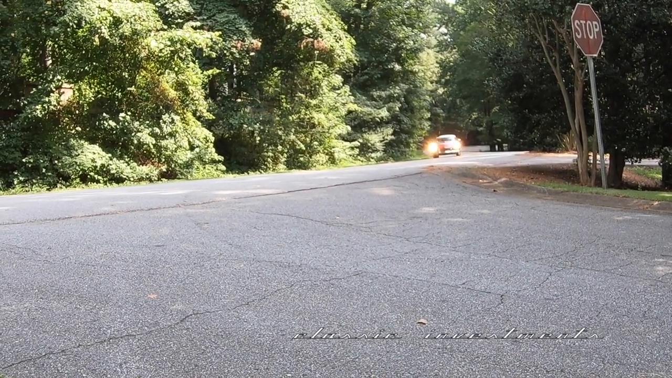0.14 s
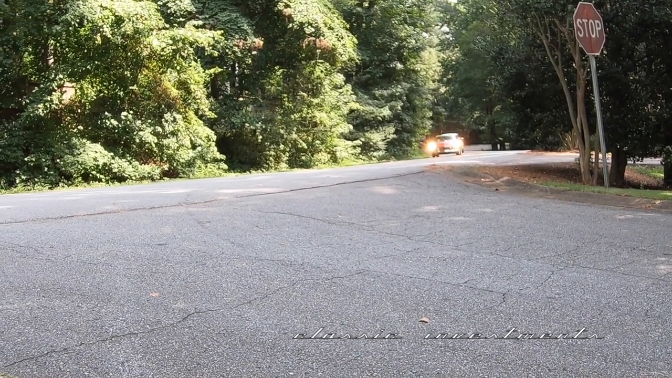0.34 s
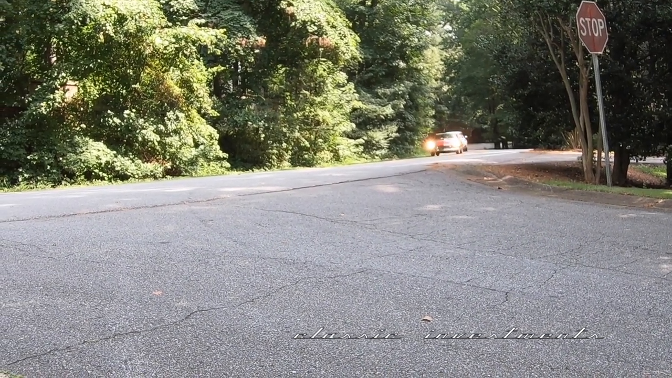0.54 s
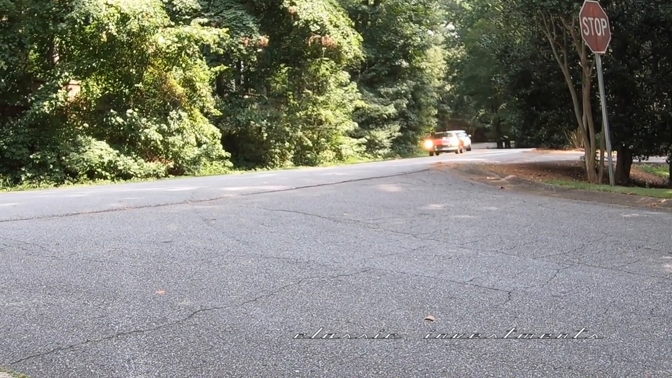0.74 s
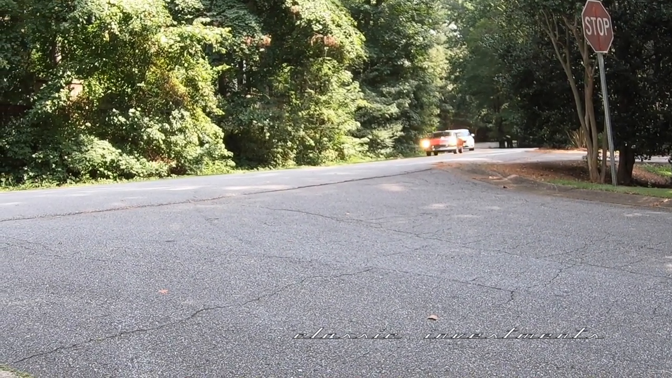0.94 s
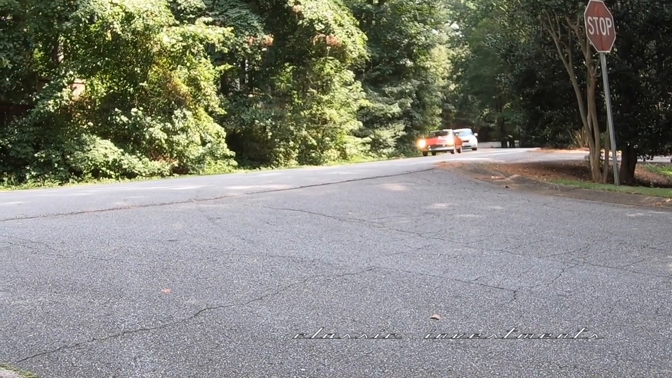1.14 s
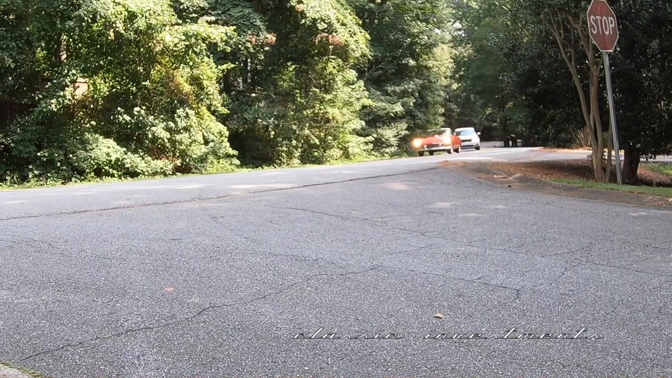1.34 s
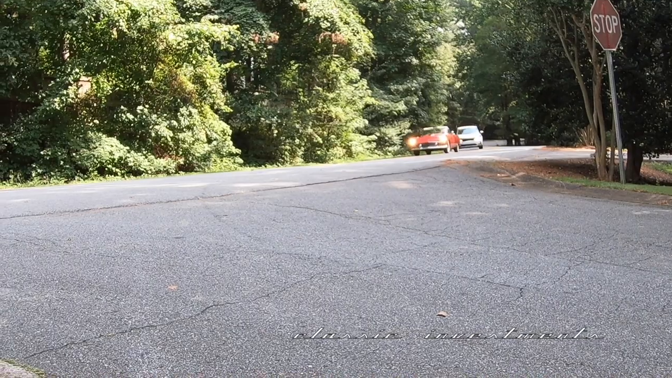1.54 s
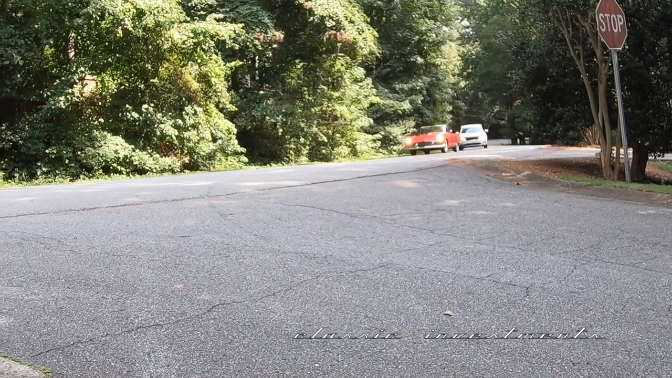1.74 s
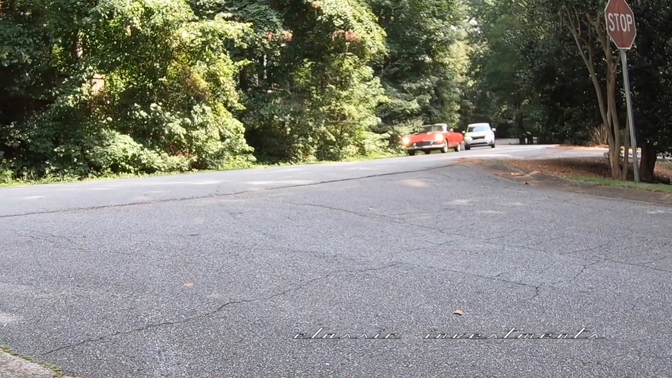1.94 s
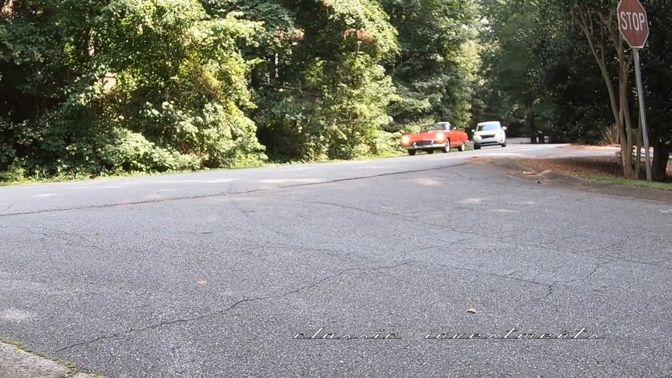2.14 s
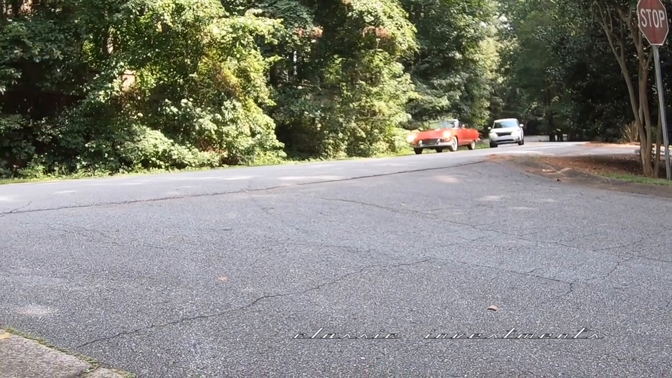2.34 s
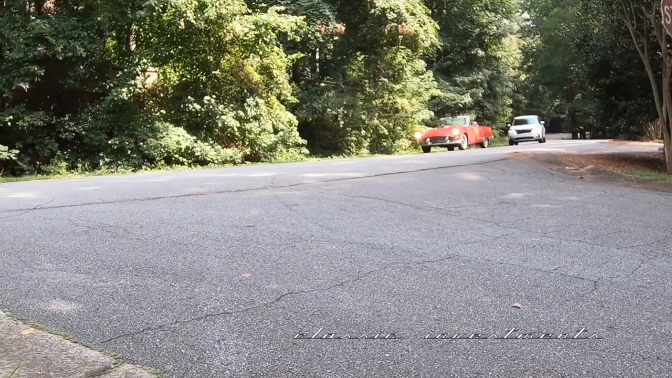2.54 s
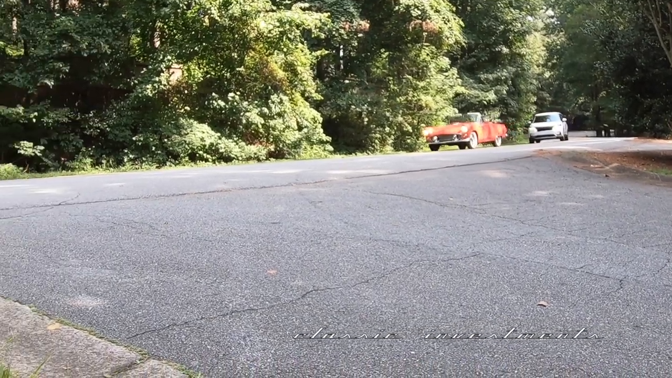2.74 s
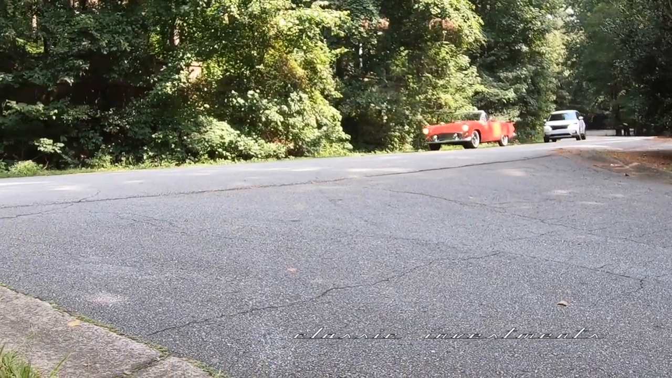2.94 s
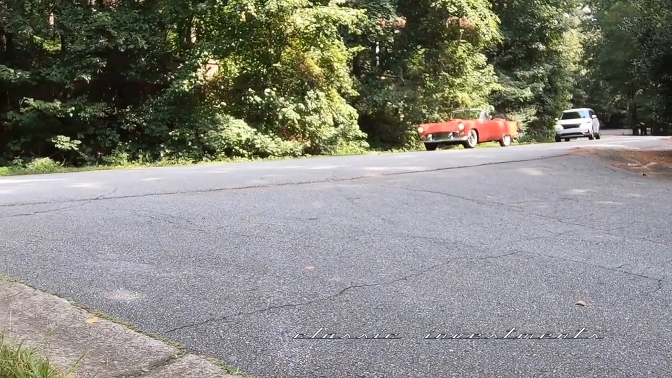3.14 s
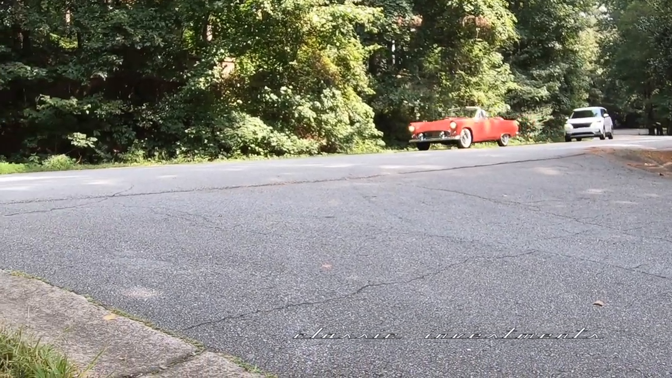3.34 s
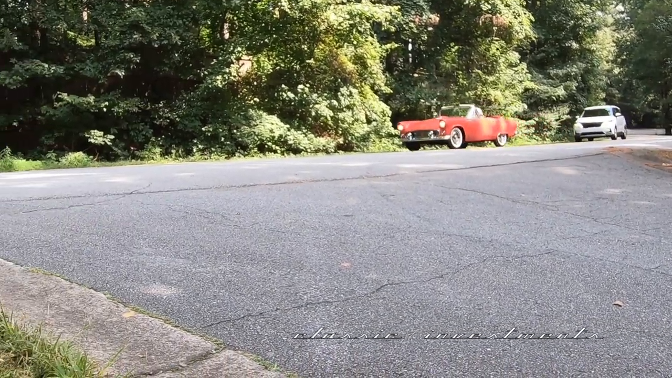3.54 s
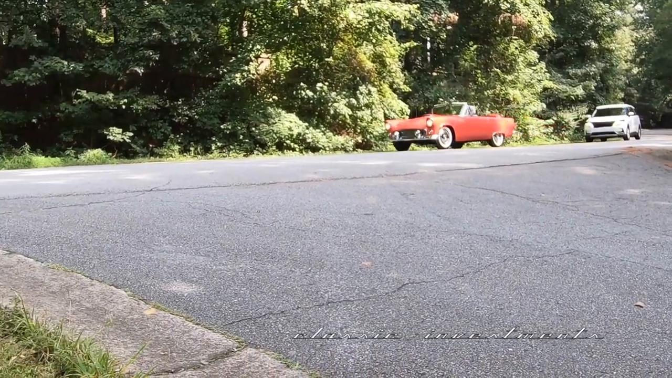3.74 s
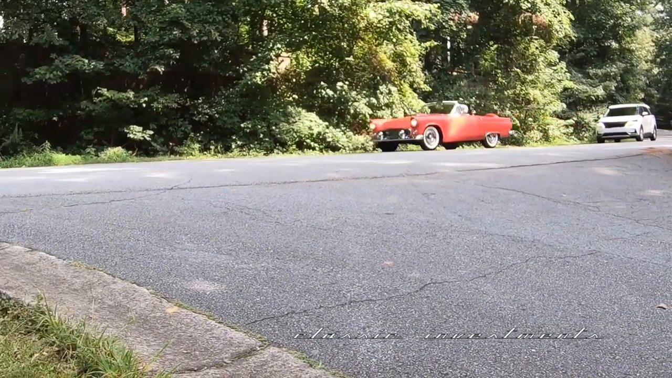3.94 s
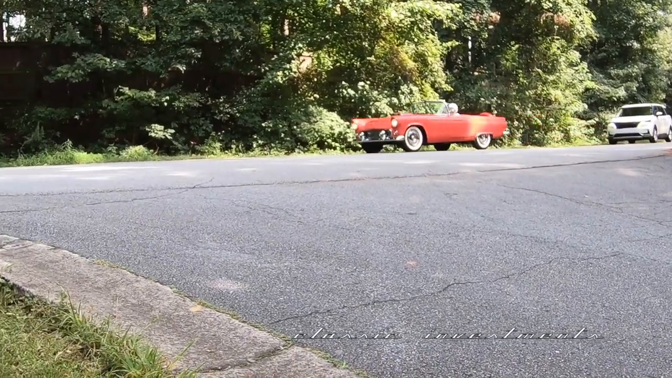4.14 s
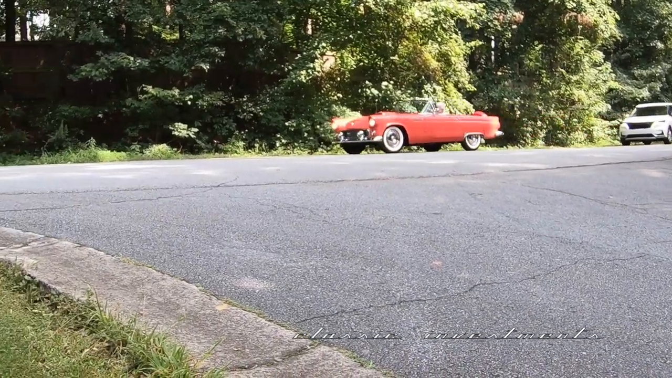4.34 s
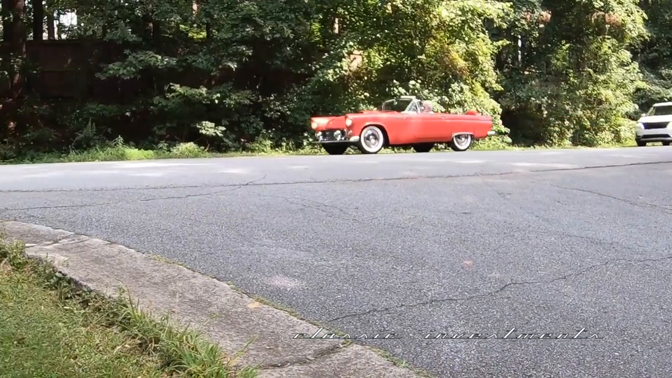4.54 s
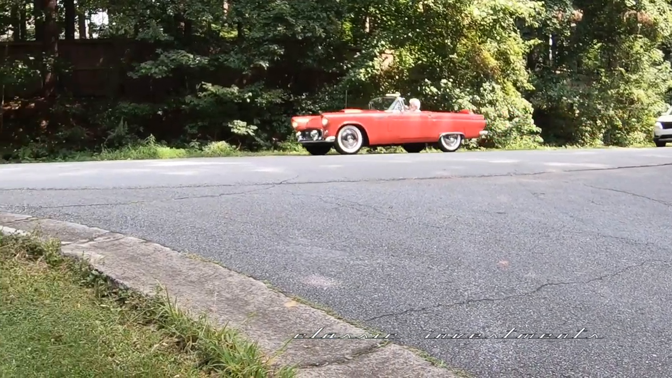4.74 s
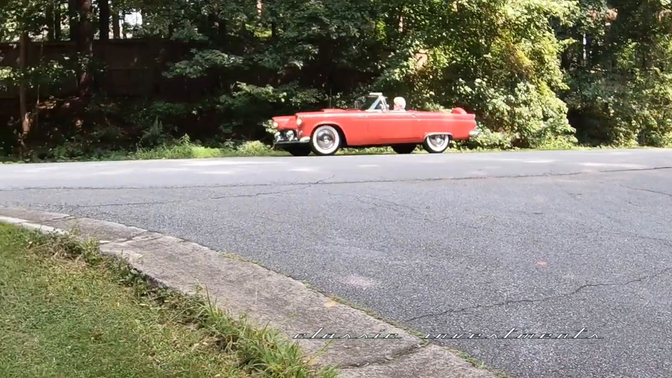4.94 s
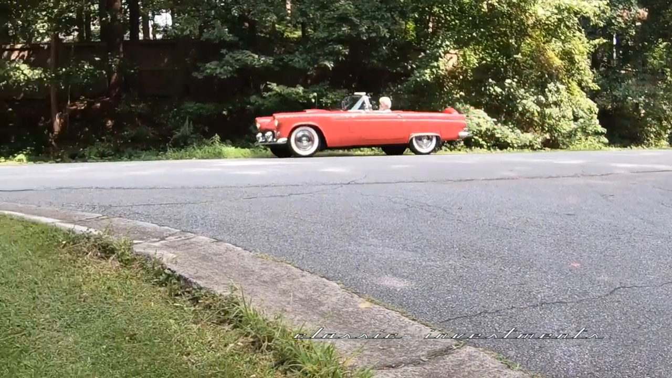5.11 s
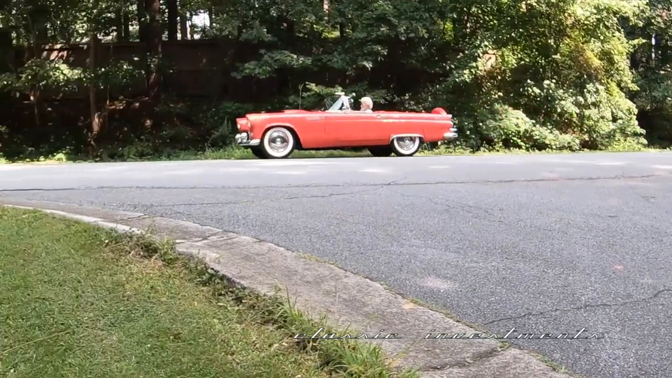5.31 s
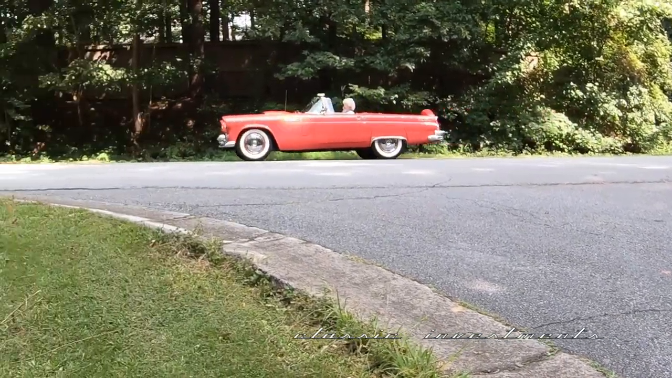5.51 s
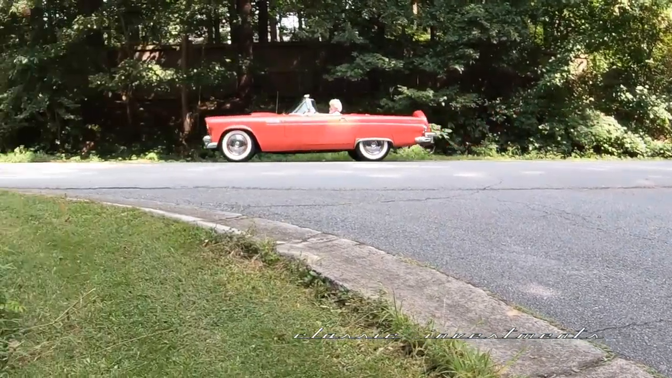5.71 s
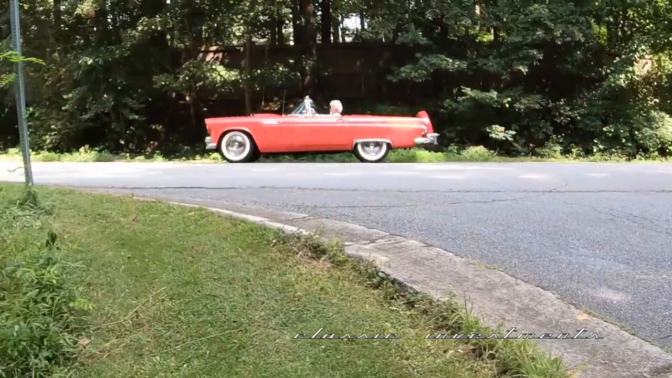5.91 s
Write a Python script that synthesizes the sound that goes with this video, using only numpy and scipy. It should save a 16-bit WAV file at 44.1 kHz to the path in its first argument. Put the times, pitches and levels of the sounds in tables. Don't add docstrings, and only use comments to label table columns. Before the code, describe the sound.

An old eight-cylinder convertible rolls up a wooded street, its low uneven exhaust rumble and tyre rush swelling as it nears, with cicadas buzzing.

```python
import sys
import numpy as np
from scipy import signal
from scipy.fft import rfft, irfft, next_fast_len
from scipy.io import wavfile
from scipy.ndimage import uniform_filter1d, map_coordinates

SR = 44100
rng = np.random.default_rng(int(sys.argv[2]) if len(sys.argv) > 2 else 0)


def master_out(mix):
    frames = np.transpose(np.atleast_2d(mix))
    ceiling = np.clip(frames, -1, 1)
    pcm = np.round(ceiling * 32767).astype(np.int16)
    wavfile.write(sys.argv[1], SR, pcm)


def field_ratio(decibels):
    return 10 ** (np.asarray(decibels, dtype=float) / 20)


N = 263277
TIME = np.arange(N) / SR

# time in seconds, camshaft turns in Hz.
SPEED = [(0, 7.549), (.3, 7.52), (1.5, 7.18), (2, 7.028), (2.8, 6.888), (3.25, 6.902), (3.5, 6.851),
         (4, 6.685), (4.3, 6.638), (4.55, 6.646), (5, 6.701), (5.25, 6.768), (5.75, 7.012), (5.97, 7.065)]


def unit(x):
    return x / np.sqrt(np.mean(x ** 2) + 1e-20)


def curves(rows):
    s, *cols = np.transpose(rows)
    return [np.interp(TIME, s, c) for c in cols]


def wobble(rate):
    knots = rng.standard_normal(int(N * rate / SR) + 4)
    return map_coordinates(knots, [TIME * rate], order=1)


def turns(hz):
    return 2 * np.pi * np.cumsum(hz) / SR


def bump(s, width):
    return np.exp(-((TIME - s) / width) ** 2)


def rush(spectrum, patchy_db):
    z = signal.stft(rng.standard_normal(N), nperseg=512)[2]
    field = uniform_filter1d(rng.standard_normal(z.shape), size=5, axis=0)
    field = uniform_filter1d(field, size=12, axis=1)
    noise = signal.istft(z * field_ratio(patchy_db * unit(field)), nperseg=512)[1][:N]
    hz, db = np.transpose([(1, -120), *spectrum, (SR / 2, -120)])
    size = next_fast_len(N + 8192)
    bins_hz = np.fft.rfftfreq(size, 1 / SR)
    colour = field_ratio(np.interp(np.log(bins_hz + 1), np.log(hz + 1), db))
    return unit(irfft(rfft(noise, size) * colour, size)[:N])


def nearness():
    closest_s, closest_m, roll_m_per_s = 6.3, 14, 5.5
    along = roll_m_per_s * (TIME - closest_s) / closest_m
    return -10 * np.log10(1 + along ** 2)


def breeze():
    # frequency in Hz, level in dB per Hz.
    rumble = [(2, -4), (8, 0), (14, -6), (24, -7.5), (45, -13), (70, -28), (120, -50)]
    gusts_db = -49.5 + .4 * TIME + 2.5 * wobble(3) + 2.5 * wobble(8)
    return field_ratio(gusts_db) * rush(rumble, patchy_db=.5)


def chorus():
    # frequency in Hz, level in dB per Hz.
    insects = [(2060, -32), (3500, -9.5), (4190, -4), (4420, -7), (5190, -7), (5840, -3), (6420, -4.5),
               (7240, -1), (7500, 2.5), (8400, -2), (9100, -4), (10300, -12.5), (11500, -35), (15000, -48),
               (22000, -120)]
    hiss_db = -55.5 + .46 * TIME - 1.5 * bump(2.2, 1)
    some_quit = np.clip((TIME - 2.56) / .3 + 1, 0, 1)
    trill_db = -57 + 2 * bump(3.1, .27) - 4.5 * some_quit
    group = turns(23.2 + .18 * wobble(1.73))
    strokes = 1 + .55 * np.cos(3 * group) + .3 * np.cos(group) + .3 * np.cos(2 * group + .7)
    band = rush([(6700, -40), (7150, -7.5), (7450, -1), (7750, -16), (8300, -31)], patchy_db=1.5)
    return field_ratio(hiss_db) * rush(insects, patchy_db=1.5) + field_ratio(trill_db) * unit(strokes * band)


def bird():
    # start in seconds, length in seconds, first pitch in Hz, settled pitch in Hz, level in dB.
    phrase = [
        (2.634, .048, 5900, 6800, -56),
        (2.716, .048, 5100, 5950, -56.5),
        (2.801, .052, 5150, 5780, -57),
        (2.915, .058, 7400, 8050, -53),
        (2.971, .026, 7950, 8650, -54.5),
        (2.995, .036, 8900, 7500, -52),
        (3.105, .095, 8250, 7560, -50),
    ]
    glide_share, attack_s, release_s, fade_db = .22, .005, .006, 3.5
    out = np.zeros(N)
    for start, length, first_hz, last_hz, db in phrase:
        t = np.clip(TIME - start, 0, length)
        hz = last_hz + (first_hz - last_hz) * np.exp(-t / (glide_share * length))
        edge = np.clip(np.minimum(t / attack_s, (length - t) / release_s), 0, 1)
        gain = np.sqrt(2) * field_ratio(db - fade_db * t / length + 2.4 * wobble(170))
        out += gain * edge * np.sin(turns(hz + 90 * wobble(200)))
    tail = rng.standard_normal(SR // 4) * field_ratio(-60 * TIME[:SR // 4] / .18)
    return out + field_ratio(-10) * signal.fftconvolve(out, tail / np.linalg.norm(tail))[:N]


def cicada(early, late, clicks, song, bright_db, flares, edge_s, swell_db, swell_rate):
    click, flutter = [turns(hz) for hz in curves(clicks)]
    turned = np.clip((TIME - 1.2) / .9, 0, 1)
    halves, power, flaring = np.zeros((2, N)), np.zeros((2, N)), np.zeros(N)
    for row, ((k, *first), (_, *last)) in enumerate(zip(early, late)):
        phase = k * click + rng.uniform(0, 2 * np.pi) + .12 * wobble(9)
        lag = rng.uniform(0, 2 * np.pi, size=2)
        main, up, down = [field_ratio(a) + (field_ratio(b) - field_ratio(a)) * turned for a, b in zip(first, last)]
        upper = up * np.sin(phase + flutter + lag[0])
        lower = down * np.sin(phase - flutter + lag[1])
        half = 2 * row // len(late)
        halves[half] += field_ratio(swell_db * wobble(swell_rate)) * main * np.sin(phase)
        halves[half] += field_ratio(swell_db * wobble(swell_rate) - 1.5) * (upper + lower)
        power[half] += main ** 2 / 2
        for start, end, line, db in flares:
            if int(line) != k:
                continue
            edge = np.clip(np.minimum(TIME - start, end - TIME) / edge_s, 0, 1)
            gain = np.sqrt(2) * field_ratio(db + 2.2 * wobble(3 / edge_s))
            flaring += gain * edge * np.sin(phase + (line > k) * (flutter + lag[0]))
    low, high = halves / np.sqrt(power)
    return field_ratio(curves(song)[0] + 1.5) * (low + field_ratio(bright_db - 1) * high) + flaring


def far_cicada():
    # harmonic, its level in dB, upper then lower sideband in dB.
    before = [(17, -75, -85, -87), (18, -72, -84, -92), (19, -68, -75, -89), (20, -80, -80, -85),
              (21, -79, -82, -92), (22, -75, -80, -92), (23, -78, -88, -92), (24, -69, -76, -84),
              (25, -79, -75, -90), (26, -74, -80, -77), (27, -78, -76, -87), (28, -73, -76, -92),
              (29, -77, -81, -92), (30, -69, -78, -92), (31, -65, -71, -71), (32, -75, -83, -76),
              (33, -71, -71, -73), (34, -79, -76, -77), (35, -69, -70, -69), (36, -69, -76, -83),
              (37, -64, -78, -73), (38, -82, -80, -87), (39, -72, -81, -73), (40, -91, -85, -85),
              (41, -76, -92, -75), (42, -92, -92, -92)]
    after = [(17, -80, -92, -92), (18, -70, -76, -92), (19, -78, -76, -92), (20, -71, -75, -85),
             (21, -81, -92, -86), (22, -70, -77, -86), (23, -76, -79, -91), (24, -69, -74, -80),
             (25, -78, -78, -90), (26, -77, -80, -80), (27, -72, -77, -84), (28, -69.5, -73, -84),
             (29, -71, -75, -92), (30, -69, -70, -76), (31, -67, -72, -69), (32, -68, -73, -74),
             (33, -76, -66, -72), (34, -67, -74, -73), (35, -67, -70, -75), (36, -66, -73, -79),
             (37, -68, -70, -74), (38, -72, -74, -79), (39, -73, -72, -72), (40, -77, -87, -78),
             (41, -82, -90, -77), (42, -86, -92, -88)]
    # time in seconds, click rate in Hz, flutter rate in Hz.
    click_rates = [(0, 245.5, 104), (1.1, 246.1, 104), (2.2, 246.7, 101.3), (3.3, 247.3, 97.5),
                   (4.2, 247.9, 94), (5, 248.5, 99), (6, 249.3, 101)]
    # time in seconds, effort in dB.
    effort = [(0, -67.5), (.3, -65.5), (1.5, -64.5), (3.5, -60.5), (4.3, -63.5), (5.2, -68), (5.97, -63)]
    # start and end in seconds, harmonic (.5: upper sideband), level in dB.
    standouts = [(.85, 1.85, 24, -69), (1.3, 1.8, 24, -70), (0, 1.3, 19, -76), (1.95, 2.75, 24, -70),
                 (1.6, 2.9, 33.5, -67.5), (1.1, 2.6, 19, -67.5), (1, 2, 22, -75), (1, 2.4, 26, -70),
                 (1.4, 2.2, 36, -71), (1.1, 2.2, 39, -73), (.5, 1.9, 41, -78), (.2, 1, 30, -73),
                 (4.1, 4.5, 30, -67), (2.9, 3.4, 30, -70), (3.3, 3.95, 18, -72), (.8, 1.9, 37, -70),
                 (1.1, 2.4, 18, -74)]
    facing_db = 5.5 * (2 * bump(1.8, 2.8) - 1)
    return cicada(before, after, click_rates, effort, facing_db, standouts,
                  edge_s=.25, swell_db=1.5, swell_rate=1.6)


def near_cicada():
    # harmonic, its level in dB, upper sideband in dB, lower sideband in dB.
    colour = [(16, -78, -95, -95), (17, -73, -77, -75), (18, -74, -80, -83), (19, -75, -81, -97),
              (20, -73, -83, -88), (21, -73, -75, -77), (22, -86, -91, -91), (23, -76, -72, -79),
              (24, -73, -76, -81), (25, -68, -72, -77), (26, -74, -78, -91), (27, -65, -69, -79),
              (28, -71, -88, -70), (29, -68, -73, -74), (30, -78, -89, -89), (31, -67, -73, -73),
              (32, -78, -88, -80), (33, -69, -78, -73), (34, -88, -92, -92), (35, -73, -75, -80),
              (36, -80, -88, -81)]
    # time in seconds, click rate in Hz, flutter rate in Hz.
    click_rates = [(3.8, 268.8, 101.5), (5, 269.3, 101.5), (5.6, 269.75, 101.5), (6, 269.9, 101.5)]
    # time in seconds, effort in dB.
    effort = [(3.6, -77), (3.9, -64.5), (4.25, -67.5), (4.95, -63), (5.75, -64), (5.97, -65)]
    # start and end in seconds, harmonic (.5: upper sideband), level in dB.
    standouts = [(4.26, 4.52, 17, -72), (4.66, 4.8, 17, -71), (5.18, 5.52, 17, -66), (5.76, 5.95, 17, -69),
                 (4.8, 5.14, 18, -71), (4.52, 4.84, 20, -70), (4.8, 5.2, 21, -69), (5.28, 5.52, 21, -65.5),
                 (5.68, 5.88, 21, -66), (5.58, 5.97, 19, -73), (4.98, 5.5, 24, -68), (5.76, 5.9, 26, -66),
                 (5.58, 5.88, 25, -66), (5.44, 5.6, 27, -55), (5.14, 5.22, 27.5, -58),
                 (5.28, 5.35, 33, -58), (5.28, 5.35, 29, -61), (4.86, 5.01, 31, -62), (5.24, 5.32, 31, -61),
                 (5.45, 5.58, 25, -62), (5.37, 5.52, 33, -61), (5.49, 5.6, 29, -60),
                 (5.41, 5.55, 31.5, -62), (5.62, 5.9, 33, -66)]
    pumps = (TIME - 5.29) / .25
    pumping_db = 3 + 2 * np.cos(2 * np.pi * pumps) * np.clip(pumps + 1.1, 0, 1)
    return cicada(colour, colour, click_rates, effort, pumping_db, standouts,
                  edge_s=.045, swell_db=3, swell_rate=5)


def wheels():
    # frequency in Hz, level in dB per Hz.
    tyres = [(150, -2), (260, -3), (295, -10.5), (420, -2), (522, -3), (572, -3.5), (807, -5.5), (980, -8),
             (1250, -7), (1530, -10.5), (1740, -9), (1990, -11.5), (2500, -12), (2770, -17), (4000, -24.5),
             (5200, -60), (8800, -120)]
    # frequency in Hz, level in dB per Hz.
    fizz = [(2000, -32), (3000, -5), (5000, 4), (8000, 3), (10500, 7), (15600, 2.5)]
    # frequency in Hz, level in dB per Hz.
    hollow = [(800, -30), (900, -3), (990, 0), (1100, -25), (1350, -25), (1500, -5), (1650, -30)]
    # time in seconds, peak in dB, pitch in Hz, length in seconds.
    knocks = [(4.38, -52, 1010, .04), (4.573, -43, 1005, 0.039), (4.652, -45, 575, 0.09),
              (4.845, -39, 998, 0.032), (4.906, -49, 950, .03), (5.4, -43, 940, 0.032),
              (5.14, -36, 998, 0.035), (5.168, -42, 930, 0.037), (5.24, -43, 583, 0.033),
              (5.424, -41.5, 957, 0.049), (5.509, -43, 877, 0.06), (5.714, -48, 970, .03),
              (5.858, -43.5, 928, 0.037), (5.959, -44, 4100, .005), (5.962, -44, 4740, .004),
              (3.74, -35, 98.4, 0.51), (4.48, -40.5, 622, 0.022), (4.24, -47, 1000, 0.049),
              (5.527, -46, 565, 0.036), (5.7, -50, 1515, .04), (4.449, -46, 902, .03),
              (4.519, -47, 1200, 0.027), (4.622, -46, 1030, .03), (4.695, -48, 800, .03),
              (4.5, -48, 1020, .03), (5.255, -46, 910, 0.044), (5.375, -43, 850, .03),
              (5.575, -49, 940, .03), (5.61, -50, 1000, .03), (5.388, -46, 1400, .03),
              (4.963, -49, 1520, .03), (5.24, -51, 1700, .03), (6.1, -50, 1570, .03),
              (5.906, -48, 1390, .03), (5.82, -46, 837, .03), (3.775, -49, 1050, .03),
              (3.3, -50, 1030, .03), (4.162, -50, 1030, .03), (5.953, -47, 1500, .04)]
    near_db = nearness()
    rush_db, fizz_db, hollow_db = -43 + 1.017 * near_db, -61 + .87 * near_db, -56 + 1.5 * near_db
    cam = turns(curves(SPEED)[0])
    throb = 1 + .045 * np.cos(cam) + .06 * np.cos(3 * cam + .6) + .05 * np.cos(6 * cam)
    out = field_ratio(rush_db + .24 * wobble(8)) * throb * rush(tyres, patchy_db=.73)
    bounced = np.roll(out - uniform_filter1d(out, size=SR // 900), round(.00199 * SR))
    out = out + .3 * field_ratio(1.2 * near_db) * bounced
    shield = .36 * np.clip((TIME - 5.47) / .3, 0, 1)
    out = out - shield * uniform_filter1d(out, size=SR // 1100)
    out += field_ratio(fizz_db + .35 * wobble(25)) * throb * rush(fizz, patchy_db=.5)
    out += field_ratio(hollow_db + 3 * wobble(28)) * rush(hollow, patchy_db=2)
    for s, db, hz, length in knocks:
        out += field_ratio(db) * bump(s, .25 * length) * np.sin(2 * np.pi * hz * TIME)
    return out


def exhaust():
    # time in seconds, level in dB.
    unison = [(0, -1.5), (.6, -2.5), (1.25, 4.5), (1.9, 0.5), (2.25, 6.5), (2.75, -0.5), (3.25, -3),
              (3.75, -2), (4, 0.5), (4.5, 2), (5, -2), (5.5, 2), (5.75, 0), (5.97, -3.5)]
    # multiple of camshaft rate, level in dB when far, halfway and near.
    weak_orders = [(5, -65, -61, -47.5), (6, -64, -61, -56), (9, -64, -60, -49), (10, -60, -56, -49),
                   (11, -57, -50, -41.5), (12, -65, -62, -56), (14, -72, -56, -46), (15, -67, -58, -44.5),
                   (17, -69, -54, -47), (18, -68, -61, -58), (19, -67, -54, -47), (21, -67, -60, -53),
                   (22, -74, -67, -65), (23, -72, -59, -56), (24, -59, -55, -50), (25, -75, -55, -52),
                   (26, -78, -63, -58), (27, -75, -63, -57), (30, -74, -65, -58), (32, -70, -64, -59),
                   (33, -74, -65, -59), (35, -74, -64, -57), (36, -74, -63, -55), (38, -76, -66, -60)]
    # time in seconds, width in seconds.
    crossings = [
        (.85, .3),
        (3.17, .03),
        (3.8, .02),
    ]
    # time in seconds, depth from 0 to 1, width in seconds.
    stumbles = [
        (3.1, 0.17, 0.079),
        (3.48, 0.7, 0.014),
        (4.31, 0.45, .02),
        (4.98, 0.4, 0.023),
        (5.275, 0.87, 0.02),
        (5.56, 0.7, 0.014),
        (5.83, 0.64, 0.012),
    ]
    # frequency in Hz, level in dB per Hz.
    roar = [(20, -22), (40, -12), (60, 5), (100, 0), (160, -2), (250, -20.5), (290, -14), (400, -39)]
    loud_firing_s, slip_turns_per_s = 2.565, .007
    pipe_order, pipe_turns, pipe_reach = 12, .3, 5
    (cam_hz,), (unison_db,), near_db = curves(SPEED), curves(unison), nearness()
    speeding_up = uniform_filter1d(np.gradient(cam_hz) * SR, size=SR // 2)
    firing_db = -42 + .6 * near_db + 4 * np.clip(speeding_up, 0, 1)
    lope_db = -29.5 + 2.54 * near_db + unison_db
    double_db = -59 + 13.5 * bump(2.62, 1.6)
    cam = turns(cam_hz)
    cam -= cam[round(loud_firing_s * SR)] + 2 * np.pi * slip_turns_per_s * (TIME - loud_firing_s)

    pipes, steady = np.ones(N), np.ones(N)
    for s, width in crossings:
        pipes *= np.abs(np.tanh((TIME - s) / width))
    for s, depth, width in stumbles:
        recovery = np.where(TIME > s, .6, 1)
        steady *= 1 - depth * bump(s, 1.2 * width * recovery)

    orders = [(8, field_ratio(firing_db + .3), .5), (13, field_ratio(lope_db + 1.1) * pipes, .25), (16, field_ratio(double_db), .5)]
    for k, *dbs in weak_orders:
        orders.append((k, field_ratio(np.interp(near_db, [-8.5, -5.1, -.5], dbs)), 1))
    lines = np.zeros(N)
    for k, gain, rough in orders:
        resonance = np.exp(-((k - pipe_order) / pipe_reach) ** 2) * (k % 2 or k == 8)
        lead = 2 * np.pi * pipe_turns * np.sign(pipe_order + .5 - k) * resonance
        loose = rough * (k / 20) ** 2
        swell = field_ratio(rough * (1.7 * wobble(2.5) + 1.6 * wobble(9)))
        drift = loose * (rng.normal(0, .8) + .45 * wobble(1.2)) + .35 * rough * wobble(7)
        lines += gain * swell * np.cos(k * cam + lead + drift)
    roar_db = -40.5 + 1.9 * near_db - .9 * unison_db
    return np.sqrt(2) * steady * lines + field_ratio(roar_db + .83 * wobble(11)) * rush(roar, patchy_db=2.5)


def scene():
    background = breeze() + chorus() + bird()
    cicadas = far_cicada() + near_cicada()
    return (background + cicadas + wheels() + exhaust())[None]


def top_cut(x):
    return signal.sosfilt(signal.butter(12, 15660, fs=SR, output="sos"), x)


def record(dry):
    kept = np.fft.rfftfreq(N, 1 / SR) < 15680
    mix = irfft(rfft(dry) * kept, N)
    return top_cut(mix)


dry = scene()
out = record(dry)
master_out(out)
```